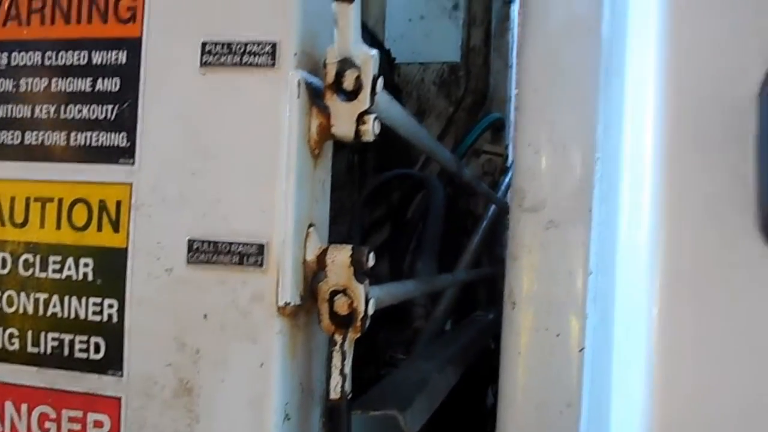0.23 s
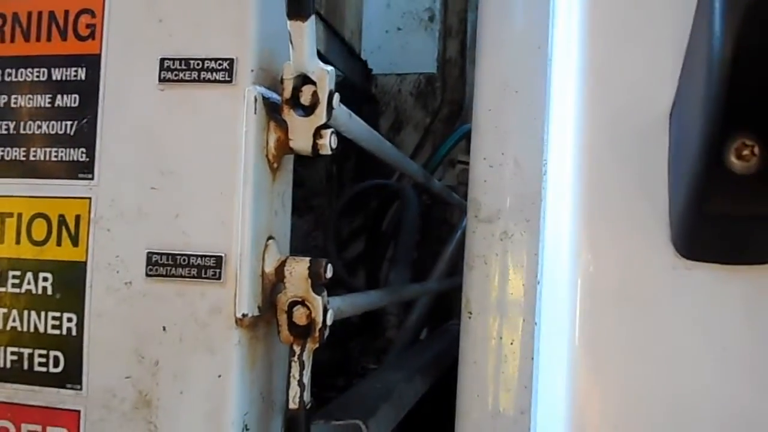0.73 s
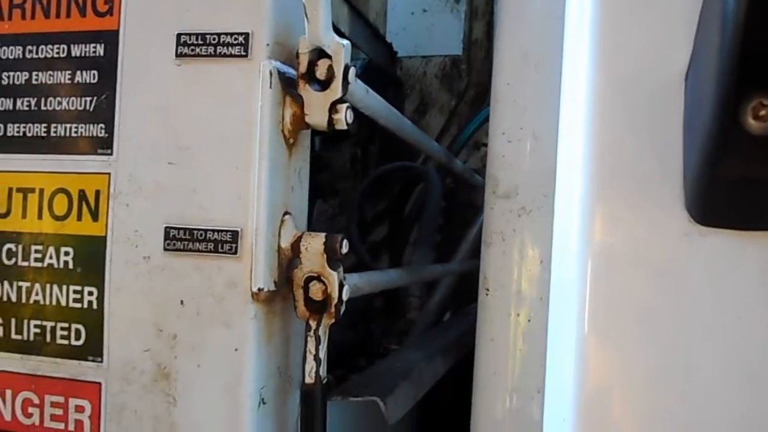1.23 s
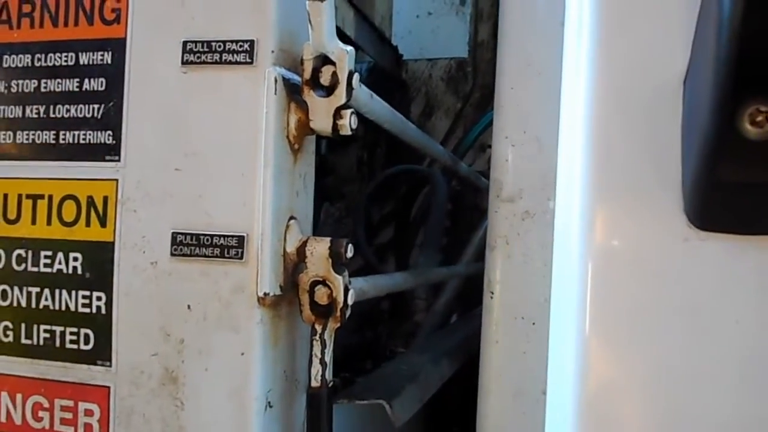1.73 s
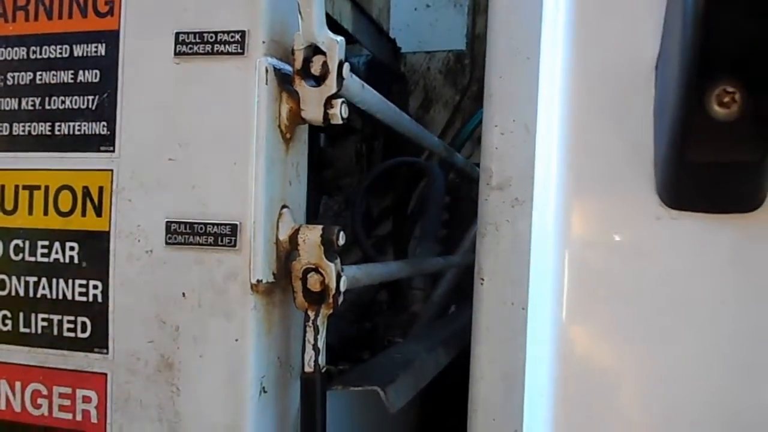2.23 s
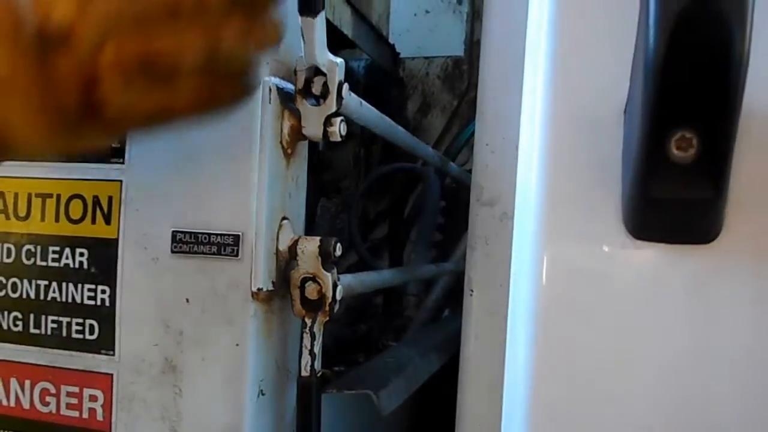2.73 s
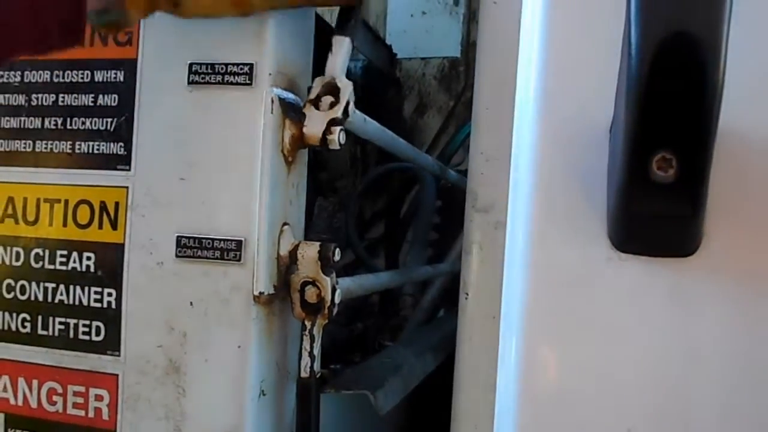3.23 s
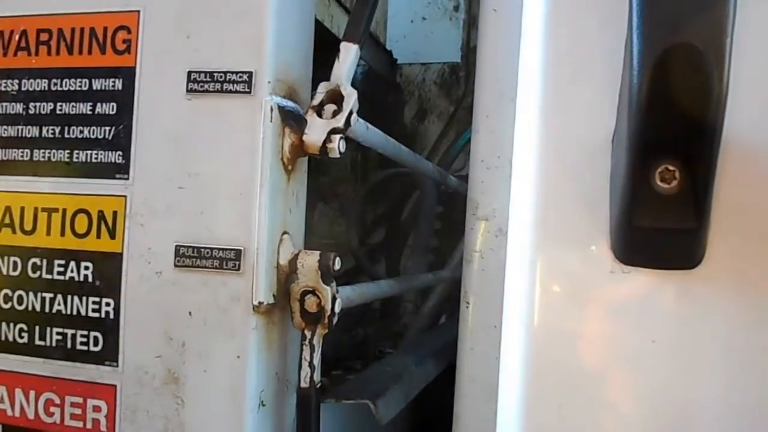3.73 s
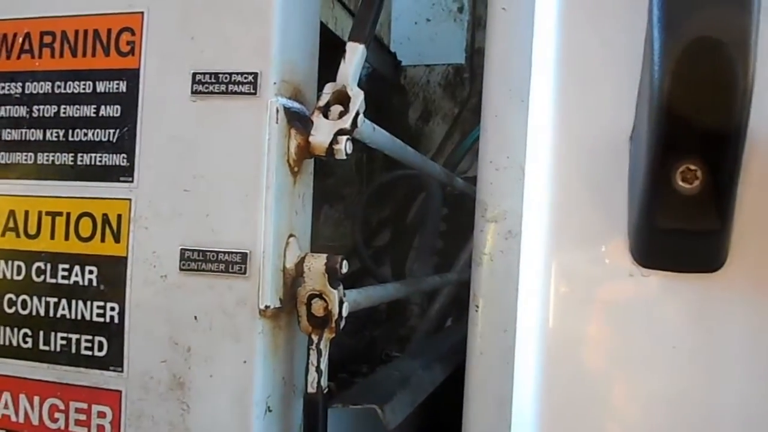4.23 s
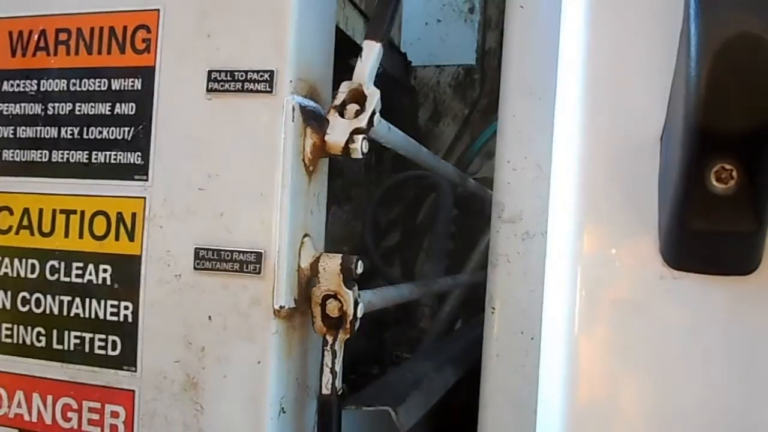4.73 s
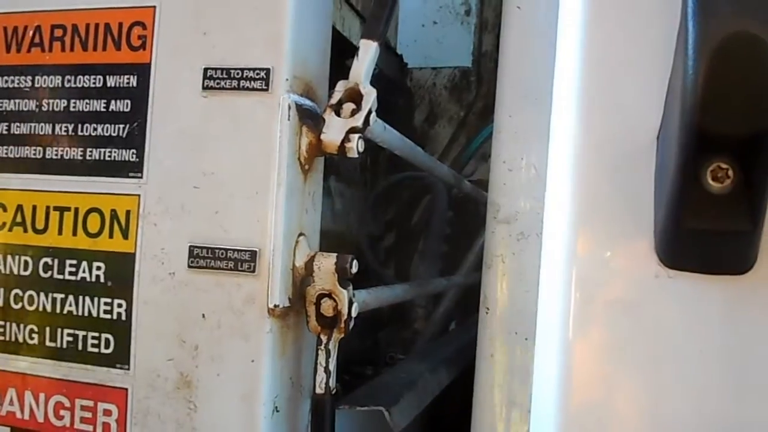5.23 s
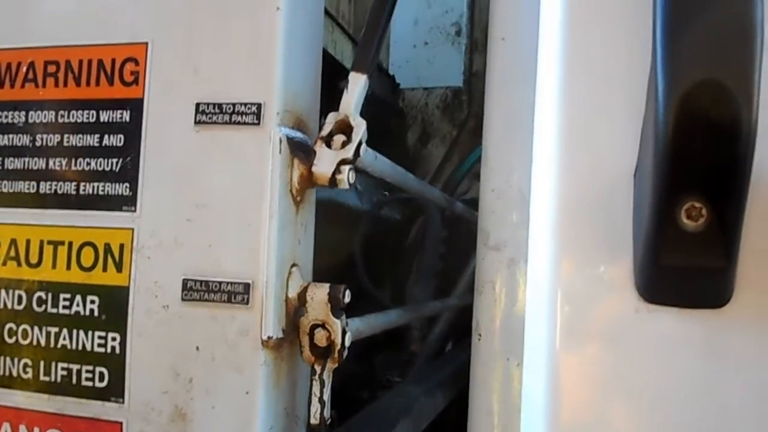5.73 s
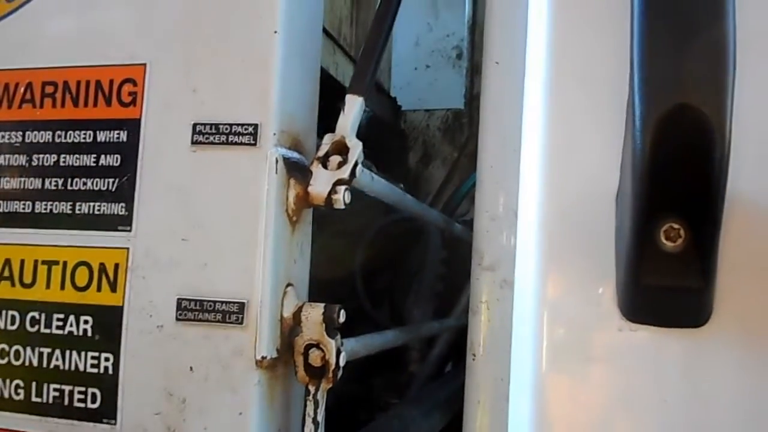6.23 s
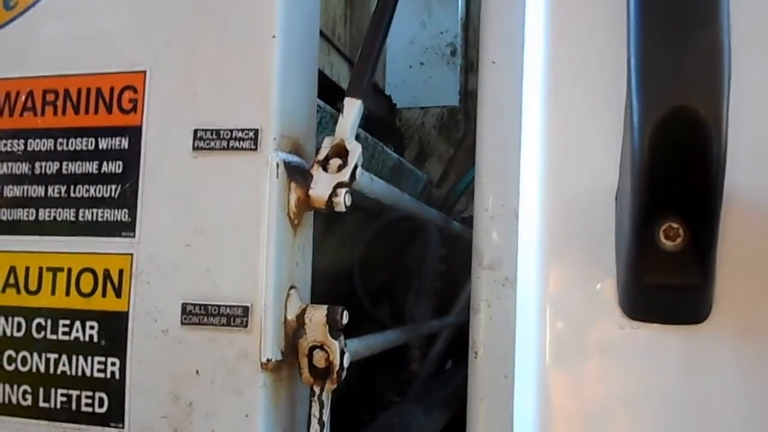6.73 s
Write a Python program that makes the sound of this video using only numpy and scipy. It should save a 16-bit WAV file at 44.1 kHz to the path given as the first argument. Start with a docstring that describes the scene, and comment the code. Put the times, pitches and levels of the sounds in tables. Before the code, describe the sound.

A dense mechanical drone of engine roar, fan wash and whining gears fills a close, dry outdoor perspective. After three seconds a short gritty metal clatter sounds, and the whine briefly thins, then swoops down as the pump takes load. The engine labours and gradually recovers, its whine wavering and grinding. A cluster of muffled thuds and a faint climbing hiss finish it, heard through a thin-sounding microphone.

```python
"""Beside a refuse truck: the diesel runs fast and drives a hydraulic pump through a train of gears.
A steel lever is pulled; the pump takes load, engine and drive sag and recover, the gear whine changes colour.
Drive and engine are sines locked to shaft and crank; roar and hiss are shaped noise; the lever is gritty
noise bursts, partly through ringing modes. Late on, a hiss climbs and the packer panel bumps in the body."""
import sys
import numpy as np
from scipy import signal
from scipy.fft import rfft, irfft, next_fast_len
from scipy.io import wavfile
from scipy.ndimage import uniform_filter1d

SR = 44100
rng = np.random.default_rng(int(sys.argv[2]) if len(sys.argv) > 2 else 0)


def inscribe(sig):
    """Save sig as 16-bit PCM at rate SR to the path in sys.argv[1].

    A 1-D sig is mono; a 2-D sig holds one channel per row.
    Samples are clipped to [-1, 1] before scaling.
    """
    pcm = np.round(np.clip(np.atleast_2d(sig).T, -1, 1) * 32767)
    wavfile.write(sys.argv[1], SR, pcm.astype(np.int16))


N = 308259

# Gear mesh. Each row: start in seconds, tooth mesh in Hz, base level of harmonics 1, 2 and 3 in dB.
MESH = [(0.0, 1323.5, -32, -26, -40.5), (0.7, 1323, -36.5, -28.5, -41), (1.2, 1319, -41, -29.5, -42),
        (1.5, 1320, -32, -32.5, -43), (2.0, 1327, -33, -30, -49), (2.4, 1325, -31.5, -31, -40),
        (2.7, 1317, -37, -30, -37), (3.06, 1319, -53, -26.5, -47), (3.13, 1251, -36, -42, -42),
        (3.22, 1139, -24, -46, -23), (3.31, 1055, -26, -30, -25), (3.38, 1007, -19.5, -44, -46),
        (3.48, 987, -23, -36, -50), (3.75, 1000, -21.5, -39, -44), (4.02, 1043, -29.5, -42, -44),
        (4.23, 1070, -34.5, -39, -31.5), (4.42, 1088, -25.5, -32.5, -38), (4.65, 1104, -21.5, -40.5, -36.5),
        (4.9, 1117, -24.5, -39, -33), (5.05, 1123, -24, -47, -37), (5.25, 1127, -29, -34, -29),
        (5.5, 1134, -25, -42.5, -38), (5.8, 1143, -29.5, -40.5, -29), (6.3, 1144, -28.5, -35.5, -29.5),
        (6.85, 1151, -28.5, -38.5, -29.5), (6.99, 1154, -34, -48, -37)]
# 4th mesh harmonic. Base level free in dB, loaded in dB.
FOURTH_DB = (-42.5, -51)
# Mesh harmonics 5 to 7 under load. Each entry: level relative to the 4th in dB.
UPPER_DB = [-4.5, -6, -16.5]
# Out-of-true idler kneading the mesh. Each row: multiple of its turn, relative depth free, depth loaded.
WOBBLE = [(1, .12, .2), (2, .22, .36), (3, .2, .16), (4, .1, .32), (5, .08, .16)]
# Pressure lost by the teeth as load comes on. Each row: time in seconds, gain of the whole drive in dB.
TAKE_UP = [(0, 0), (3.07, 0), (3.11, -9), (3.315, -9), (3.335, 0), (6.99, 0)]
# Second gear pair, then pump ripple. Each entry: multiple of the pump shaft turn.
STRONG_ORDERS = [47, 94, 10, 20, 30, 40, 100]
# Their levels. Each row: base level free in dB, loaded in dB, flicker in dB.
STRONG_DB = [(-38, -40, 2), (-38, -47.5, 1.5), (-36, -52, 0.1), (-35.5, -49, -0.1), (-47.5, -51.5, 2),
             (-39.5, -54.5, 2), (-42.5, -45.5, 1.5)]
# Fainter teeth tones. Each entry: multiple of the pump shaft turn.
FAINT_ORDERS = [15, 48, 51, 60, 70, 113.6, 125.5, 141, 150.9, 152.9, 162.1, 188, 205.8]
# Their levels. Each row: base level free in dB, loaded in dB.
FAINT_DB = [(-50, -71), (-42.5, -47.5), (-48.5, -53), (-45, -53), (-61, -52.5), (-40.5, -56),
            (-49.5, -62.5), (-41.5, -61), (-47.5, -53.5), (-44, -53), (-60, -47), (-54, -44.5),
            (-49, -56.5)]


def drive(load):
    """Two gear pairs and the pump, all geared to one shaft; tooth contact sounds at multiples of its turn."""
    mesh_per_turn, idler_teeth = 52.92, 64
    engage_s, engage_takes_s = 3.07, .15   # the valve shifts and the drive tones change over
    flicker_db, grind_db, grind_corner_hz = 1.4, -34, 130
    mesh_hz, first_db, second_db, third_db = in_time(MESH)
    mesh_hz = uniform_filter1d(mesh_hz, size=3000)
    mesh = 2 * np.pi * np.cumsum(mesh_hz) / SR
    shaft, idler = mesh / mesh_per_turn, mesh / idler_teeth
    engaged = np.clip((np.arange(N) / SR - engage_s) / engage_takes_s, 0, 1)
    fourth_db = blend(*FOURTH_DB, engaged) + engaged * case_lift_db(4 * mesh_hz)

    # real part kneads the level, imaginary part the phase
    knead = sum(blend(free, loaded, load) * np.exp(1j * k * (idler + k)) for k, free, loaded in WOBBLE)
    take_up_db = in_time(TAKE_UP)[0]
    slack_rad = -.04 * take_up_db
    # uneven tooth contact, worst in the slack, smears each harmonic in proportion to its number
    chatter_rad = blend(.025, .09, load) + slack_rad
    shaken_mesh = mesh + .1 * knead.imag + chatter_rad * drift(70)

    out = np.zeros(N)
    for k, db in enumerate((first_db, second_db, third_db, fourth_db), start=1):
        out += (1 + k / 2.3 * knead.real) * tone(k * shaken_mesh, db, flicker_db)
    for k, db in enumerate(UPPER_DB, start=5):
        out += load * tone(k * shaken_mesh, fourth_db + db, flicker_db)
    for k, (free, loaded, flicker) in zip(STRONG_ORDERS, STRONG_DB):
        lift_db = engaged * case_lift_db(k * mesh_hz / mesh_per_turn)
        out += tone(k * shaft, blend(free, loaded, engaged) + lift_db, flicker)
    for k, db in zip(FAINT_ORDERS, FAINT_DB):
        out += tone(k * shaft, blend(*db, load), 2.5)

    # loaded teeth grind around the 3rd harmonic, strongest where the gear case resonates
    case = 1 / np.hypot(1, (3 * mesh_hz - 3450) / 250)
    out += load * case * from_db(grind_db) * narrow_noise(3 * mesh, grind_corner_hz)
    return out * from_db(take_up_db)


# Gear case resonances. Each row: centre in Hz, half-width at half the dB lift in Hz, peak lift in dB.
CASE = [(203.4, 3.6, 12), (218, 6, 5), (405, 7.2, 11), (433.5, 6.1, 5.5), (560, 11, 9), (598, 27, 12.5),
        (648, 7.2, 8.5), (763, 30, 13.5), (905, 14, 10.5), (1004.8, 27, 12), (1986, 25, 10), (3945, 23, 17),
        (4036, 52, 14.5), (4267, 48, 14), (4520, 92, 8.5)]


def case_lift_db(hz):
    """The gear case resonates and lifts tones that pass its resonances."""
    return sum(db / (1 + ((hz - centre_hz) / half_width_hz) ** 2) for centre_hz, half_width_hz, db in CASE)


# Engine tones. Each entry: multiple of half the firing rate.
ENGINE_ORDERS = [2, 3, 4, 6, 7, 8, 14, 20, 22, 28, 33, 37.5, 40]
# Their levels. Each row: base level free in dB, loaded in dB.
ENGINE_ORDER_DB = [(-54, -55.5), (-59.5, -60), (-56.5, -56.5), (-51.5, -56.5), (-48, -47), (-63, -59),
                   (-58.5, -48.5), (-52.5, -58), (-45, -48.5), (-46, -60), (-48, -45.5), (-49, -42.5),
                   (-42, -44.5)]


def engine_tones(crank, exhaust_db, load):
    """Exhaust and timing-gear tones on multiples of the crank; the lowest leave by the exhaust pipe."""
    out = np.zeros(N)
    for k, db in zip(ENGINE_ORDERS, ENGINE_ORDER_DB):
        pipe_db = exhaust_db * (k < 4)
        out += tone(k * crank, blend(*db, load) + pipe_db, flicker_db=1.0)
    return out


# Lever and linkage scraping over the detent.
# Each row: start in seconds, rise in seconds, length after the rise in seconds (half held, half falling), level in dB.
LEVER = [(3.062, .002, .010, -17), (3.074, .003, .009, -22), (3.084, .004, .013, -12.5),
         (3.097, .002, .009, -19), (3.106, .004, .09, -28.5), (3.135, .006, .02, -33),
         (3.178, .008, .018, -29), (3.215, .008, .018, -31)]
# Rod modes. Each row: pitch in Hz, relative level in dB, t60 in seconds before the grip's cap.
LEVER_MODES = [(1900, -4, .03), (2530, -10, .03), (3600, -4, .03), (3960, -6, .03), (4240, -7, .03),
               (4680, 9, 0.033), (5360, 6, .03), (6300, 8, .03), (6610, 0, .03), (7030, 6, 0.027),
               (7560, 13, .025)]


def rod(x):
    """The gripped rod rings briefly; the grip caps t60."""
    grip_t60_s = .03
    return sum(from_db(db) * ring(x, hz, min(t60_s, grip_t60_s)) for hz, db, t60_s in LEVER_MODES)


def lever():
    """Bursts of gritty steel contact, partly direct, partly through the rod; a link ticks as it settles."""
    bright_hz, dull_hz, rod_db = 1400, 8000, -8
    tick_s, tick_hz, tick_t60_s, tick_db = 3.212, 9550, .03, -30
    t, shape = np.arange(N) / SR, np.zeros(N)
    for start_s, rise_s, length_s, db in LEVER:
        rise = (t - start_s) / rise_s
        fall = (start_s + rise_s + length_s - t) / length_s * 2
        shape += from_db(db) * np.clip(np.minimum(rise, fall), 0, 1)

    uneven = from_db(.5 * drift(150) * (t > 3.105))
    grit = uneven * rng.standard_normal(N) * from_db(1.5 * rng.standard_normal(N))
    grit = signal.sosfilt(signal.butter(5, dull_hz, fs=SR, output="sos"), grit)
    direct = signal.sosfilt(signal.butter(1, bright_hz, "high", fs=SR, output="sos"), grit)
    scrape = shape * direct / direct.std()
    ringing = from_db(rod_db) * rod(shape * grit) / rod(grit).std()

    click = 1. * (np.arange(N) == round(tick_s * SR))
    tick = from_db(tick_db) * ring(click, tick_hz, tick_t60_s)
    return scrape + ringing + tick


# Panel bumps. Each row: time in seconds, strike level in dB before modes and scatter.
BUMPS = [(6.766, -24.5), (6.777, -20), (6.793, -26)]
# Body modes. Each row: pitch in Hz, relative level in dB, t60 in seconds.
BODY_MODES = [(300, -3, .08), (400, -3, .05), (545, 0, .06), (614, -3, .05), (690, 0, .06), (810, -4, .04),
              (1350, -3, .03), (1950, -3, .03)]


def panel():
    """Dull bumps ring the modes of the steel body, each struck with chance level and sign."""
    scatter_db = 2.37
    at = [round(s * SR) for s, _ in BUMPS]
    strike_db, out = np.array(BUMPS)[:, 1], np.zeros(N)
    for hz, mode_db, t60_s in BODY_MODES:
        clicks = np.zeros(N)
        height = from_db(strike_db + mode_db + rng.normal(0, scatter_db, len(at)))
        clicks[at] = height * rng.choice([-1, 1], len(at))
        out += ring(clicks, hz, t60_s)
    # soft contact: no treble; the body is too small for deep bass
    return signal.sosfilt(signal.butter(2, [230, 3000], "band", fs=SR, output="sos"), out)


# Thin hiss climbing as the stroke ends. Each row: time in seconds, centre in Hz, level in dB.
HISS = [(0, 6760, -83), (6.6, 6980, -67.5), (6.7, 7020, -46), (6.77, 7250, -41), (6.8, 8000, -45),
        (6.88, 8770, -43), (6.99, 8750, -41)]


def hiss():
    """The climbing hiss: narrow noise around a moving centre."""
    hz, level_db = in_time(HISS)
    return from_db(level_db) * narrow_noise(2 * np.pi * np.cumsum(hz) / SR, corner_hz=300)


# Housings ringing in the roar. Each row: centre in Hz, width of one pass in Hz, level free in dB, loaded in dB.
HOUSINGS = [(1304, 150, -43.5, -46), (2910, 49, -52, -64), (3360, 200, -37.5, -39),
            (2200, 760, -55.5, -35.5), (6530, 930, -57, -42), (685, 134, -46.5, -43),
            (110.4, 35, -54.5, -58)]


def housings(load):
    """Housings excited by the roar: noise twice through each resonance."""
    out = np.zeros(N)
    for hz, width_hz, free, loaded in HOUSINGS:
        t60_s = np.log(1000) / (np.pi * width_hz)
        once = ring(rng.standard_normal(N), hz, t60_s)
        out += from_db(blend(free, loaded, load)) * rms_one(ring(once, hz, t60_s))
    return out


# Roar of engine, fan and oil flow, pump free. Each row: frequency in Hz, relative density in dB per Hz.
ROAR_FREE = [(24, -58), (40, -27), (152, -19), (243, -9.5), (314, -13.5), (490, -5.5), (564, -8.5),
             (1310, 0), (1410, -4.5), (2100, -3), (2710, -5.5), (2980, -2), (6760, -14), (9610, -29),
             (10800, -49), (14000, -78), (22000, -120)]
# The same, pump loaded. Each row: frequency in Hz, relative density in dB per Hz.
ROAR_LOADED = [(24, -51), (40, -37), (156, -22), (216, -14), (286, -19), (426, -11.5), (923, -11),
               (1140, -5.5), (1580, -14), (2980, -14), (3850, -11.5), (6760, -20), (9170, -28.5),
               (10800, -48), (14000, -85)]


def roar(crank, exhaust_db, load, roar_db):
    """Half-octave bands of noise; the treble swells at each firing and surges a few times a second."""
    patchy_db, knock_db, surge_db = .5, .5, 1.0
    size = next_fast_len(N)
    hz = np.maximum(np.fft.rfftfreq(size, 1 / SR), 1)
    white, out = rfft(rng.standard_normal(size)), np.zeros((2, N))
    surge, together = drift(4.5), drift(9)
    colours = []
    for curve in (ROAR_FREE, ROAR_LOADED):
        curve_hz, curve_db = np.transpose(curve)
        colours.append(from_db(np.interp(np.log(hz), np.log(curve_hz), curve_db)))

    for octave in np.log2(40) + np.arange(18) / 2:   # log2 of the band centre in Hz
        band = np.cos(np.pi / 2 * np.clip((np.log2(hz) - octave) * 2, -1, 1)) ** 2
        knock = knock_db * np.clip(octave - 10, 0, 1) * np.cos(2 * crank)
        swell = surge_db * np.clip(octave - 11, 0, 1) * surge
        rumble = exhaust_db * np.clip(7 - octave, 0, 1)   # the lowest bands come from the exhaust
        gain = from_db(patchy_db * (together + drift(17.0)) + knock + swell + rumble)
        out += gain * irfft(white * band * colours, size)[:, :N]
    free, loaded = rms_one(out[0]), rms_one(out[1])
    return from_db(roar_db) * (free * (1 - load) + loaded * load)


def from_db(db):
    """Decibels to gain."""
    return 10 ** (np.asarray(db) / 20)


def rms_one(x):
    """Scale to rms 1."""
    return x / np.sqrt(np.mean(x ** 2) + 1e-20)


def in_time(rows):
    """Columns of a curve table, one value per sample."""
    s, *columns = np.transpose(rows)
    return [np.interp(np.arange(N) / SR, s, c) for c in columns]


def blend(free, loaded, load):
    """From the free value to the loaded one."""
    return free + (loaded - free) * load


def drift(rate_hz):
    """Slow chance of rms 1: noise through two equal poles, run at a 40th of SR."""
    r = np.exp(-80 * np.pi * rate_hz / SR)
    noise = rng.standard_normal(N // 40 + 2002)
    slow = signal.lfilter([1], [1, -2 * r, r * r], noise)[2000:]   # settled part
    return np.interp(np.arange(N) / 40, np.arange(len(slow)), rms_one(slow))


def tone(phase, level_db, flicker_db):
    """A sine whose rms level flickers around level_db."""
    gain = np.sqrt(2) * from_db(level_db + flicker_db * drift(11.5))
    return gain * np.sin(phase + 2 * np.pi * rng.random())


def ring(x, hz, t60_s):
    """Two-pole resonance: a unit click sets a decaying sine of initial height 1 ringing."""
    r, w = from_db(-60 / (t60_s * SR)), 2 * np.pi * hz / SR
    return signal.lfilter([0, np.sin(w)], [1, -2 * r * np.cos(w), r * r], x + 1e-18)


def narrow_noise(phase, corner_hz):
    """Noise within corner_hz either side of a moving centre; rms 1."""
    lowpass = signal.butter(2, corner_hz, fs=SR, output="sos")
    slow = signal.sosfilt(lowpass, rng.standard_normal((2, N)))
    return rms_one(slow[0] * np.cos(phase) + slow[1] * np.sin(phase))


# Engine course. Each row: time in seconds, half the firing rate in Hz, pump load 0-1, roar level in dB.
ENGINE = [(0, 32.35, 0.04, -25), (1, 32.6, 0, -24.5), (2, 32.74, 0.04, -24.5), (3.08, 32.69, 0, -24),
          (3.25, 30.42, 0.7, -25), (3.5, 28.8, 0.53, -26), (3.8, 30.16, 0.86, -28),
          (4.1, 30.82, 0.94, -24.5), (4.5, 31.36, 0.88, -26.5), (5, 32.17, .99, -27),
          (5.5, 32.4, 0.94, -26), (6, 32.45, 0.94, -27.5), (6.5, 32.58, 0.95, -26.5),
          (6.78, 32.4, .99, -24.5), (6.82, 32.63, 0.9, -29), (6.99, 32.44, 1, -28)]
# Deep exhaust note, dropping out while the engine labours. Each row: time in seconds, gain in dB.
EXHAUST = [(0, -0.5), (3.08, 0), (3.2, -9), (3.45, -9), (3.6, -1.5), (3.82, -14.5), (3.95, 0), (4.3, 2),
           (6.99, 2)]


def scene():
    """All sources, sharing one crank and one pump load, reach one microphone."""
    half_firing_hz, load, roar_db = in_time(ENGINE)
    exhaust_db = in_time(EXHAUST)[0]
    load = np.clip(load, 0, 1)
    crank = 2 * np.pi * np.cumsum(half_firing_hz) / SR
    mono = drive(load) + engine_tones(crank, exhaust_db, load)
    mono += lever() + panel() + hiss()
    mono += housings(load) + roar(crank, exhaust_db, load, roar_db)
    return np.stack([mono, mono])


def record(dry):
    """A small microphone loses the deep bass; the top is cut."""
    bass_hz, cutoff_hz = 70, 10600
    thin = signal.sosfilt(signal.butter(2, bass_hz, "high", fs=SR, output="sos"), dry)
    return signal.sosfilt(signal.ellip(10, .5, 80, cutoff_hz, fs=SR, output="sos"), thin)


dry = scene()
out = record(dry)
inscribe(out)
```